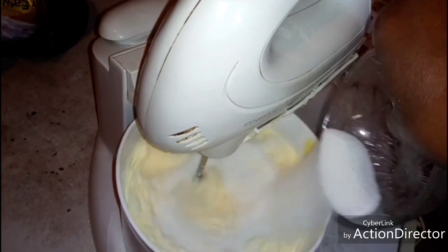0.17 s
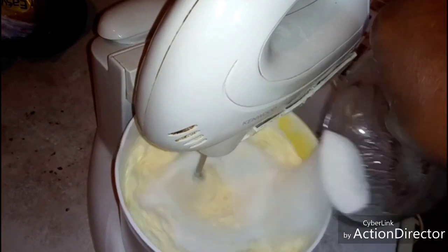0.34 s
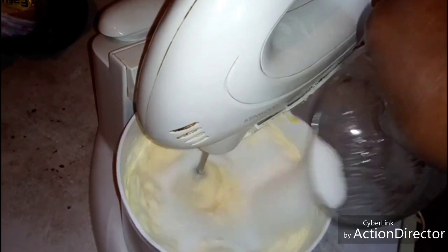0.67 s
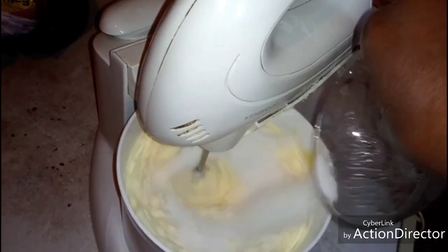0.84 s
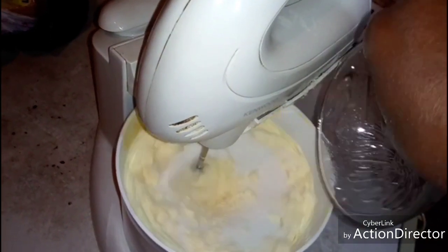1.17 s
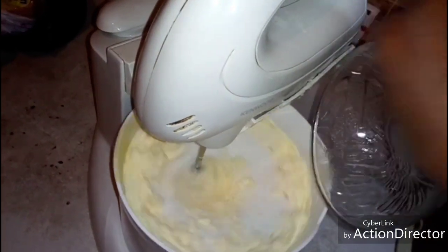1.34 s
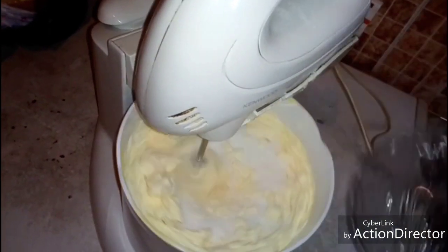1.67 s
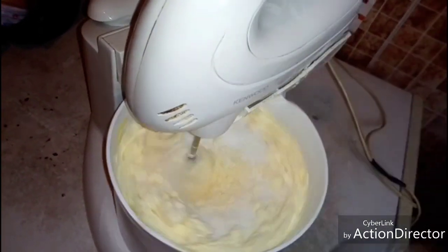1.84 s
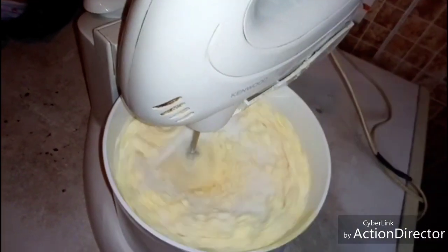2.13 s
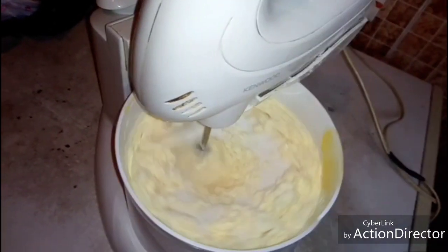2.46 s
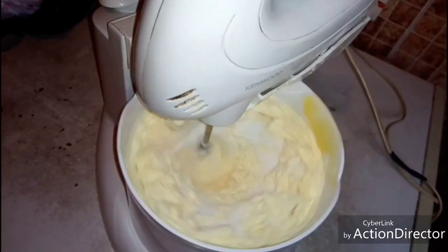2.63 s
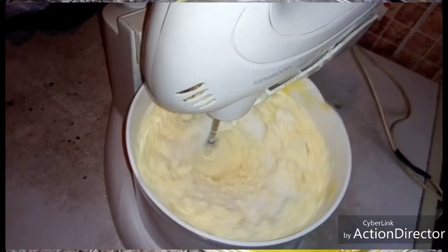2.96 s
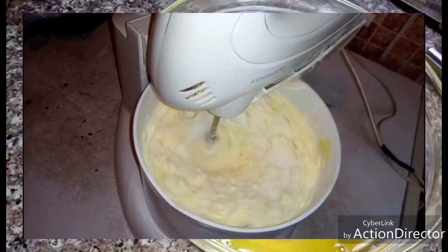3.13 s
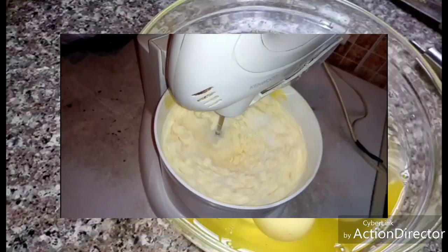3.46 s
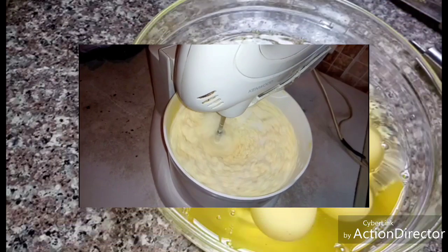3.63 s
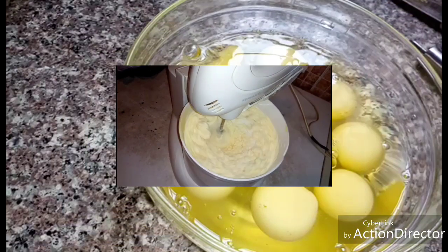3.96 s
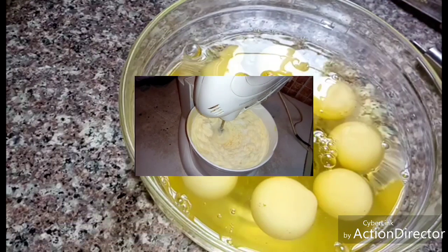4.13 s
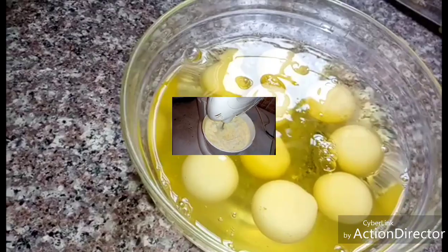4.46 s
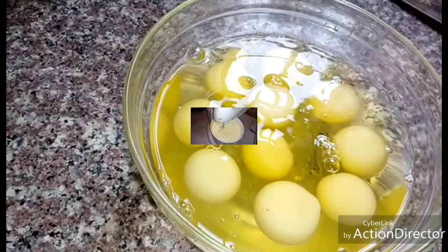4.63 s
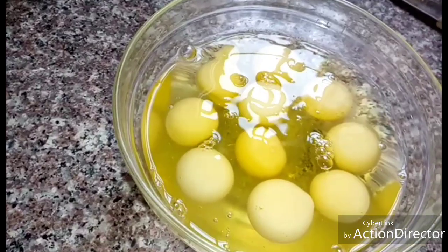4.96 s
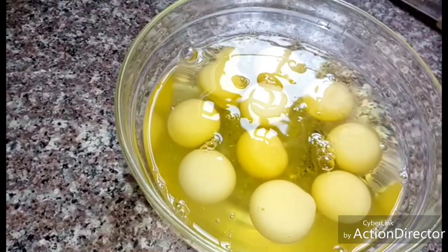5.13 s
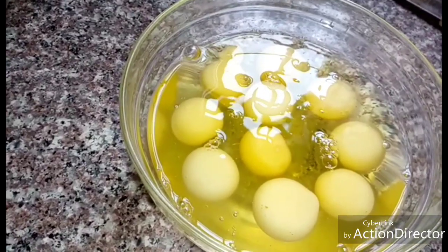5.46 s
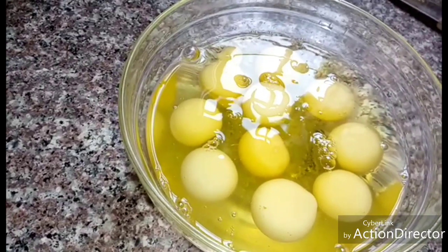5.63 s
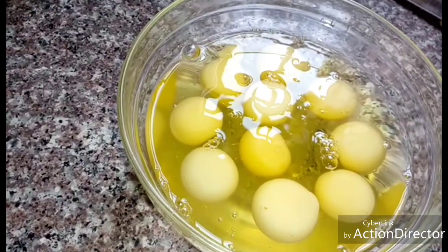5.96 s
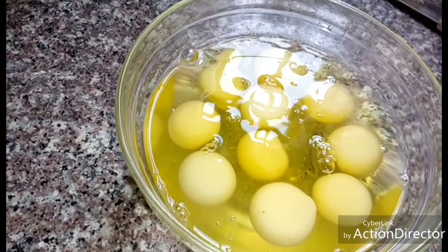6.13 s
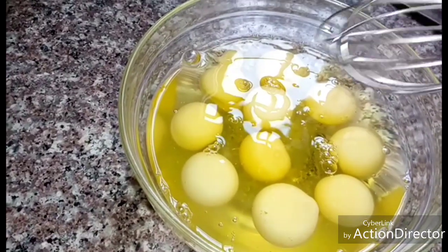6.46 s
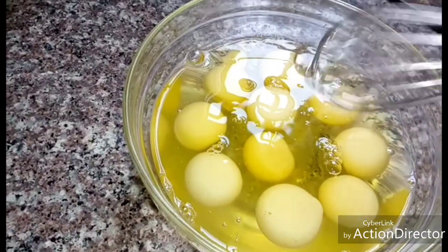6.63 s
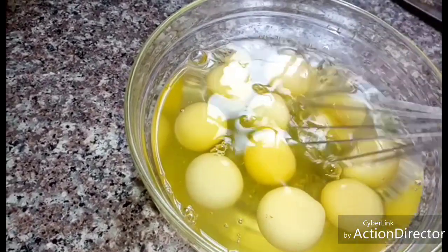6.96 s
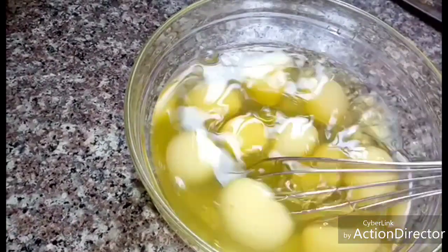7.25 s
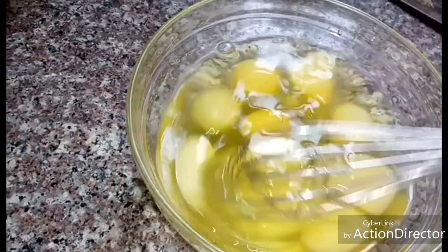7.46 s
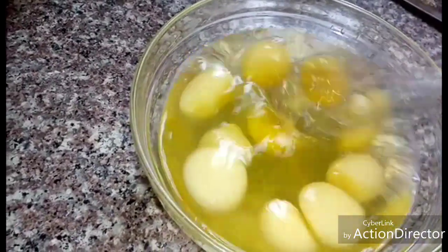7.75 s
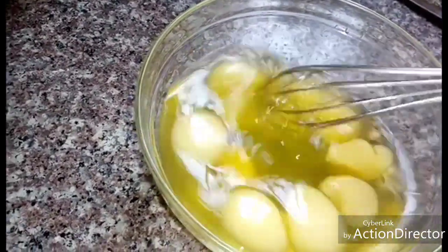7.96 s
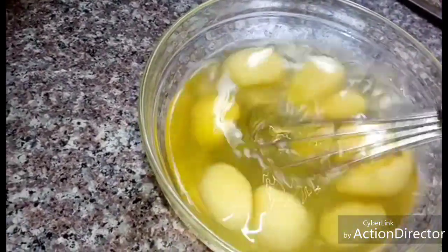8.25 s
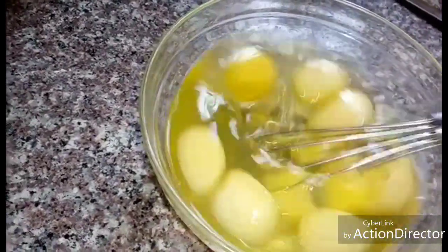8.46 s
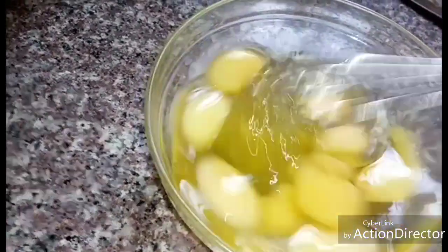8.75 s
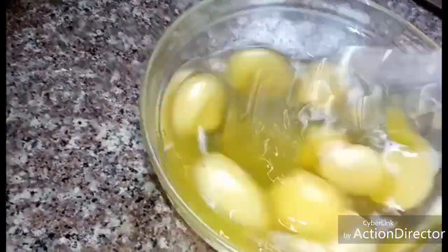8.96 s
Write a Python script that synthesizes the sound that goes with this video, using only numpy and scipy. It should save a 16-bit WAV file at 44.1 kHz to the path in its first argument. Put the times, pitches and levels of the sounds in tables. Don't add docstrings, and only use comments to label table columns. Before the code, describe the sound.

A hand mixer roars close up with a steady high whine, its beaters rasping sugar, crunching and knocking the bowl, rubbing the wall near the end. It cuts off suddenly. A very quiet kitchen fades in, faint sparrows chirping and a far dove cooing outside. Then a wire whisk strikes and scrapes a glass bowl of eggs in uneven clicks with short rings, while a nearer dove coos softly. One small microphone, dull bass.

```python
import sys
import numpy as np
from scipy import signal
from scipy.fft import rfft, irfft, next_fast_len
from scipy.io import wavfile

SR = 44100
rng = np.random.default_rng(int(sys.argv[2]) if len(sys.argv) > 2 else 0)


def makeup_ratio(level_db):
    decades = np.asarray(level_db, float) / 20
    return 10 ** decades


def master(y):
    cut = np.clip(np.atleast_2d(y).T, -1, 1)
    pcm = np.round(cut * 32767)
    wavfile.write(sys.argv[1], SR, pcm.astype(np.int16))


N = 400869
T = np.arange(N) / SR
CUT_S = 4.026

# (time [s], peak level [dB], crack pitch [Hz], top end level [dB], landing of the wires [ms])
BLOW_TABLE = [
    (7.122, -46, 3130, -30, 1.4),
    (7.238, -22.5, 3740, -52, 1.16),
    (7.695, -42.5, 3180, -44, .4),
    (8.117, -22.5, 5820, -7, 2.5),
    (8.233, -40.5, 3400, -30, .3),
    (8.7268, -27, 5500, -9, .7),
    (8.8636, -31.5, 7200, -1.5, .5),
    (8.8745, -33.5, 6600, -3, 0.91),
    (9.0614, -25, 4600, -34, 0.13),
    (9.086, -30.5, 1900, -5, 1.2),
]


def rms_one(x):
    return x / np.sqrt(np.mean(x ** 2) + 1e-20)


def in_time(rows):
    s, *columns = np.transpose(rows)
    return [np.interp(T, s, c) for c in columns]


def drift(rate):
    r = np.exp(-80 * np.pi * rate / SR)
    slow = signal.lfilter([1], [1, -2 * r, r * r], rng.standard_normal(N // 40 + 2002))[2000:]
    return np.interp(np.arange(N) / 40, np.arange(len(slow)), rms_one(slow))


def ring(x, hz, t60):
    r = makeup_ratio(-60 / (t60 * SR))
    w = 2 * np.pi * hz / SR
    return signal.lfilter([0, np.sin(w)], [1, -2 * r * np.cos(w), r * r], x + 1e-18)


def resonate(x, hz, width_hz):
    r = np.exp(-np.pi * width_hz / SR)
    poles = [1, -2 * r * np.cos(2 * np.pi * hz / SR), r * r]
    return signal.lfilter([(1 - r * r) / 2, 0, (r * r - 1) / 2], poles, x)


def band(x, hz, width_hz):
    return rms_one(resonate(resonate(x, hz, width_hz), hz, width_hz))


def coloured(spectrum, peaks, patchy_db):
    hz = np.maximum(np.fft.rfftfreq(N, 1 / SR), 1)
    point_hz, point_db = np.transpose(spectrum)
    db = np.interp(np.log(hz), np.log(point_hz), point_db)
    db = np.maximum(db, np.where(hz > 9000, point_db[-2], -200))
    for at, width, peak_db in peaks:
        db = db + peak_db / (1 + (2 * (hz - at) / width) ** 2)
    size = next_fast_len(N)
    shaped = rfft(rng.standard_normal(N), size)[:len(hz)] * makeup_ratio(db)
    octave = np.clip(np.log2(hz / 60), 0, 8)
    total = np.zeros(N)
    for k in range(9):
        part = irfft(shaped * np.maximum(1 - abs(octave - k), 0), size)[:N]
        total += part * makeup_ratio(patchy_db * drift(27))
    return rms_one(total)


def hump(start, length):
    u = np.clip((T - start) / length, 0, 1)
    return np.sin(np.pi * u ** 0.64)


def wavering(hz, blur_hz, clear):
    turn = 2 * np.pi * np.cumsum(hz) / SR
    blurred = drift(blur_hz) * np.cos(turn) + drift(blur_hz) * np.sin(turn)
    return np.sqrt(2 * clear) * np.cos(turn) + np.sqrt(1 - clear) * blurred


def microphone(x):
    x = signal.sosfilt(signal.butter(2, 120, "high", fs=SR, output="sos"), x)
    main = signal.sosfilt(signal.butter(6, 6900, fs=SR, output="sos"), x)
    return main + makeup_ratio(-32.5) * x + makeup_ratio(-14) * resonate(x, 15300, 900)


def mixer():
    # (time [s], brush whine [Hz], whine level [dB], fan tone level [dB])
    speed = [(0, 3372, -32, -32), (.22, 3362, -30, -30), (.6, 3338, -28.5, -31.5), (.92, 3327, -32, -34.5),
             (1.3, 3320, -29, -35.5), (1.62, 3319, -29.5, -39.5), (1.8, 3333, -30, -35),
             (2.2, 3329, -30.5, -35.5), (2.5, 3320, -29.5, -35.5), (2.9, 3315, -31, -39),
             (3.34, 3313, -30.5, -40.5), (3.55, 3300, -37.5, -37), (4.0, 3306, -38.5, -33)]
    whine_hz, whine_db, fan_db = in_time(speed)
    rotor_hz = whine_hz / 12
    turn = 2 * np.pi * np.cumsum(rotor_hz * (1 + .0005 * drift(25) + .0003 * drift(3))) / SR
    # 21.52 rotor turns each, one pass falling at 3.587 s
    beat = (turn - turn[round(3.587 * SR)]) / 21.52
    rubbed_s = np.clip(T - 3.22, 0, 1)
    motor = motor_roar(rubbed_s) + rotor_tones(turn, whine_db, fan_db) + motor_hum(turn)
    return motor + beater_rasp(beat, rubbed_s) + sugar_crunch(beat) + bowl_knocks()


def motor_roar(rubbed_s):
    # (frequency [Hz], level per Hz [dB])
    roar_shape = [(18, -68.5), (30, -38), (97, -14), (238, -8.5), (277, -8.5), (323, -7.5), (567, -4.5),
                  (1160, -12.5), (1620, -12.5), (2440, -11), (4380, -9.5), (6600, -19), (8310, -40),
                  (13500, -44)]
    # (frequency [Hz], width [Hz], level [dB])
    housing = [(180, 45, 5), (372.8, 54, 7), (475, 57, 3), (777, 30, 7), (1200, 250, -1.5),
               (1724, 340, 4.5), (2400, 330, -2), (3660, 340, -3.5), (4560, 1400, 2.5)]
    port = (15150, 1500, 15)
    roar_dip_db = -1.5 * np.clip(rubbed_s / .2 - 1, 0, 1)
    return makeup_ratio(-20.27 + roar_dip_db) * coloured(roar_shape, housing + [port], patchy_db=1.58)


def rotor_tones(turn, whine_db, fan_db):
    # (multiple [1], level at the start [dB], level at mid time [dB], level at the end [dB])
    rotor = [(1, -34.5, -33.5, -34), (2, -33.5, -37.5, -36.5), (5, -49, -44.5, -40.5),
             (6, -45.5, -41, -44.5), (7, -47, -43, -43), (13, -49, -52.5, -54), (16, -43, -43, -43.5),
             (14, -44, -52, -52), (23, -56, -56, -62), (25, -65, -60, -61), (28, -70, -68, -68),
             (30, -76, -74, -70), (35, -84, -82, -74), (36, -74, -72, -80), (38, -73, -77, -70),
             (40, -77, -73, -72), (42, -76, -82, -78), (43, -79, -71, -70), (45, -77, -82, -73),
             (48, -82, -82, -72), (52, -74, -69, -73), (53, -72, -72, -65), (54, -66, -67, -72),
             (55, -76, -69, -68)]
    # (multiple [1], level [dB], time [s], length [s])
    overtones = [(11, -46, 0, .5), (11, -48, 2.8, 1.2), (24, -45, .3, 1.0), (24, -48, 1.2, 1.6),
                 (24, -45, 2.7, .9), (24, -48, 3.5, .6), (18.6, -44, 3.1, 1.0), (.7, -40, 0, 4.5),
                 (6.66, -43, 1.4, 2.6)]
    tones = np.zeros(N)
    for k, *levels in rotor:
        db = np.interp(T, [0, CUT_S / 2, CUT_S], levels) + 6 + 3.0 * (k > 22)
        tones += makeup_ratio(db + 1.3 * drift(14)) * np.sin(k * turn + k * k)
    for k, db, s, length in overtones:
        tones += makeup_ratio(db + 4 + 2 * drift(5)) * hump(s - .1, length) * np.sin(k * turn)
    tones += makeup_ratio(whine_db + 2.7 + 1.2 * drift(18)) * np.sin(12 * turn)
    tones += makeup_ratio(fan_db + 2.0 + 2.5 * drift(9)) * np.sin(10 * turn)
    tones += makeup_ratio(-45 + 3 * T + 2 * drift(4)) * np.sin(20 * turn)
    return tones


def motor_hum(turn):
    mains = 2 * np.pi * 100.4 * T
    hum = makeup_ratio(-40 + 1.2 * drift(5.6)) * np.sin(mains)
    hum += makeup_ratio(-40 - 2.26 * T) * np.sin(.3722 * turn + 1.1)
    hum += makeup_ratio(-44.5 + 6.3 * drift(12.0)) * 2 * np.sin(mains) * np.sin(turn)
    return hum


def beater_rasp(beat, rubbed_s):
    grains = (rng.random(N) < 2500 / SR) * makeup_ratio(2.9 * np.minimum(rng.exponential(1, N), 3))
    grains = grains * rng.choice([-1, 1], N)
    rasp = microphone(band(grains, 4500, 1100) + makeup_ratio(-3.5) * band(grains, 1650, 620))
    rub_db = 11 * np.minimum(rubbed_s / .2, 1) - 3.5 * rubbed_s ** 2
    swing_db = 3 * np.cos(beat - .4) * np.cos(2 * beat - .8)
    return rasp * makeup_ratio(-36 + rub_db + swing_db)


def sugar_crunch(beat):
    # (time [s], peak level [dB])
    crushes = [(0.0969, -38), (.263, -38), (0.9455, -35.5), (1.175, -39), (1.318, -38), (1.645, -43),
               (2.069, -41), (2.623, -34.5), (3.05, -35.5), (1.4867, -32.5), (1.7968, -32), (1.954, -34),
               (2.1852, -37), (2.34, -41), (2.6483, -32.5), (2.7314, -33), (2.8069, -29.5), (3.1955, -33),
               (3.506, -34), (3.5855, -36), (3.663, -36), (3.744, -35), (3.9, -33)]
    passes = np.diff(beat // np.pi, prepend=0) == 1
    clicks = passes * makeup_ratio(-44.5 + 2.5 * np.cos(beat) + 3.0 * drift(30))
    clicks[[round(s * SR) for s, db in crushes]] = makeup_ratio(np.array(crushes)[:, 1])
    grit = rng.standard_normal(400) * makeup_ratio(-60 * np.arange(400) / (.015 * SR))
    burst = np.convolve(clicks, grit)[:N]
    crunch = makeup_ratio(-2) * resonate(burst, 9500, 6000) + makeup_ratio(4) * resonate(burst, 15100, 1500)
    crunch += makeup_ratio(16) * microphone(resonate(burst, 4500, 2500))
    return crunch + makeup_ratio(18) * ring(clicks, 4500, .008)


def bowl_knocks():
    # (time [s], level [dB], pitch [Hz], time to fall 60 dB [s])
    knock_table = [(0.329, -9, 4550, 0.026), (.946, -12, 4600, 0.032), (2.186, -15, 3740, 0.06),
                   (2.584, -14, 2200, .03), (2.585, -14, 1550, .04), (2.623, -15, 5200, .012),
                   (2.651, -13, 3740, .05), (2.653, -14, 4700, .04), (2.654, -21, 3050, .04),
                   (2.731, -16, 3850, .03), (2.732, -17, 4600, .02), (2.808, -13, 4450, .025),
                   (2.808, -18, 3790, .05), (3.196, -17, 4500, .02), (3.432, -8, 4700, .015),
                   (3.5868, -5.5, 4430, .016), (3.744, -16, 4740, .02), (3.9, -7, 4510, 0.014),
                   (2.8, -25.5, 2760, 1.3), (3.2, -20, 3265, 1.0)]
    shake = rng.standard_normal(N)
    knocks = np.zeros(N)
    for s, db, hz, t60 in knock_table:
        at, t = round(s * SR), T[:round(t60 * SR)]
        body = .55 * band(shake[at:][:len(t)], hz, 0.23 * hz)
        if t60 < .5:
            body = body + 1.1 * np.sin(2 * np.pi * hz * t)
        knocks[at:][:len(t)] += makeup_ratio(db - 60 * t / t60) * np.minimum(t / .0012, 1) * body
    return signal.sosfilt(signal.butter(4, 6000, fs=SR, output="sos"), knocks)


def blows():
    # (pitch [Hz], level [dB], time to fall 60 dB [s])
    rings = [
        [(3180, -3.5, 0.17), (3300, -11, .2), (4560, -4, .2), (4620, -11, .3), (5800, -14, .2), (6150, -10, .2)],
        [(1740, -1, 0.055), (965, -9, 0.04), (1296, -4.5, 0.047), (3000, -1, .03), (2535, -5, .25),
         (2610, 3.5, 0.037), (3785, 4.5, .15), (3740, -15, 0.33), (5230, -8, 0.32), (5300, -14, 0.27),
         (6700, -12, 0.14), (8576, -25, 0.33), (9450, -19, .3), (10400, -10, .15), (7300, -26, .3)],
        [(3200, 8.5, 0.03), (4300, -15, .05), (5000, -11, .05)],
        [(480, -21.5, 0.15), (1185, -7, .06), (2160, -15, 0.056), (3250, -17, 0.15), (3400, -14.5, 0.13),
         (4100, -13, 0.036), (5000, -9, 0.036), (5700, -12, .05), (7260, -18, .1), (9450, -14, .04),
         (10850, -4, .04), (13540, -7, .04)],
        [(3070, 11, 0.017), (9400, 8, .008), (7800, -6, .008)],
        [(3500, -10.5, 0.054), (5300, -14, 0.048), (6960, -10, 0.047), (9500, -10, 0.14), (11400, -4, .1),
         (12200, -4, .08), (8600, -6, .04), (2250, -20, .1), (1250, -22, .05)],
        [(6700, -16, .03)],
        [(4480, -14, 0.08), (4710, -16, .12), (6470, -20, .15)],
        [(2053, 6.5, .03), (1500, -26, .03), (3300, -4, 0.011)],
        [(1600, -1, .05)],
    ]
    out, t = np.zeros(N + SR), T[:SR // 2]
    tail_fall = makeup_ratio(-60 * t / 0.167)
    for (s, db, hz, top_db, landing_ms), modes in zip(BLOW_TABLE, rings):
        rise = np.minimum(1000 * t / max(landing_ms, .05), 1)
        wires = np.clip(landing_ms / 1.4, .3, 1)
        noise = rng.standard_normal((3, len(t)))
        ping = makeup_ratio(-8) * resonate(ring(1.0 * (t == 0), hz, .012), hz, hz)
        crack = makeup_ratio(-6.0) * microphone(band(noise[0], hz, 3500)) * makeup_ratio(-60 * t / (0.023 * wires))
        top = band(noise[1], 15200, 1300) + makeup_ratio(-14) * band(noise[1], 9300, 6000)
        tick = makeup_ratio(top_db + 3.5) * top * (makeup_ratio(-60 * t / .009) + makeup_ratio(-32.5) * tail_fall)
        tail = makeup_ratio(-21.5) * wires * microphone(band(noise[1], 0.82 * hz, 5500)) * tail_fall
        rattle = (t == 0) + makeup_ratio(-28.0) * wires * noise[2] * tail_fall
        rung = np.zeros(len(t))
        for mode_hz, mode_db, t60 in modes:
            rung += makeup_ratio(mode_db - 9.5) * resonate(ring(rattle, mode_hz, t60), mode_hz, mode_hz)
        thin = signal.butter(2, .3 * hz, "high", fs=SR, output="sos")
        hit = signal.sosfilt(thin, rise * (ping + crack + tick + tail)) + rise * microphone(rung)
        out[round(s * SR):][:len(t)] += makeup_ratio(db) * hit
    return out[:N]


def scrape():
    glass_hz = [1275, 1610, 2230, 2450, 2720, 2960, 3400, 3850, 4120, 4710, 4980, 5420, 5630, 6470]
    # (time [s], length [s], level
    # [dB], pitch [Hz], width [Hz])
    swishes = [(7.106, .1, -71, 5800, 1200), (7.233, 0.17, -48, 2170, 3980), (7.264, 0.15, -55.5, 700, 900),
               (7.305, 0.076, -60, 4400, 5000), (7.31, .05, -56, 5130, 400), (7.25, .1, -53, 1400, 900),
               (7.31, .05, -52, 1650, 500), (7.36, 0.35, -68, 5700, 700), (7.4, 0.17, -67, 4100, 300),
               (7.43, .18, -62, 2960, 900), (7.621, 0.21, -74, 5500, 400), (8.14, 0.12, -66, 3500, 2500),
               (8.128, .04, -57, 5000, 1500), (7.7, .05, -68, 3100, 400), (7.85, .25, -77, 3500, 2500),
               (8.15, .2, -74, 2000, 300), (8.38, .15, -77, 2920, 300), (8.235, 0.055, -66, 3700, 1800),
               (8.299, 0.33, -73.5, 3200, 500), (8.332, .1, -74, 3850, 250), (8.48, .05, -77, 5000, 3000),
               (8.605, 0.17, -63, 4100, 400), (8.622, 0.15, -61, 2750, 1200), (8.65, 0.06, -69, 5400, 1200),
               (8.731, 0.12, -68, 2240, 500), (8.82, 0.06, -65, 3850, 200), (8.878, 0.095, -56, 2700, 1100),
               (8.88, 0.1, -66, 1500, 600), (8.874, 0.096, -62, 5470, 3000), (8.72, .1, -67, 5500, 3000),
               (8.975, .07, -69, 3800, 1200), (9.01, .04, -57.5, 2120, 400),
               (9.029, 0.032, -56.5, 2600, 900), (8.95, .11, -65, 2750, 500), (9.048, .04, -63, 4000, 4000),
               (9.064, .05, -59, 4000, 4000),
               (8.115, .045, -40, 11800, 2600), (8.125, .12, -63, 3400, 200), (8.88, .1, -63, 4500, 500),
              (8.695, .02, -60, 3000, 700), (8.65, .03, -64, 5300, 1500), (8.84, .02, -65, 3400, 300),
              (8.86, .04, -65, 3450, 300), (8.73, .12, -70, 4900, 200), (8.68, .2, -72, 1270, 100)]
    wires = makeup_ratio(-8) * rng.standard_normal(N)
    for mode_hz in [*np.geomspace(300, 7500, 30) * rng.uniform(0.92, 1.03, 30), *glass_hz]:
        clicks = (rng.random(N) < 400 / SR) * makeup_ratio(2.5 * np.minimum(rng.exponential(1, N), 4))
        wires += rms_one(ring(clicks, mode_hz, 0.058)) * np.sqrt(mode_hz / 44 / 3000)
    strokes = np.zeros(N)
    for s, length, db, hz, width_hz in swishes:
        strokes += makeup_ratio(db) * hump(s, length) * band(wires, hz, width_hz)
    return microphone(strokes)


def singing_bowl():
    # (pitch [Hz], level [dB], time to fall 60 dB [s])
    glass_tones = [
        (1336, -48.5, 0.88),
        (2390, -47.5, 0.86),
        (3700, -45, 0.46),
        (5130, -39, 0.24),
    ]
    since = np.maximum(T - 7.315, 0)
    sing = np.zeros(N)
    for hz, db, t60 in glass_tones:
        sing += makeup_ratio(db - 60 * since / t60) * wavering(np.full(N, hz), 30, clear=0.88)
    sing *= np.minimum(since / 0.043, 1)
    return sing * makeup_ratio(-60 * np.maximum(T - 7.46, 0) / .12)


def sparrows():
    # (time [s], peak level [dB], pitch [Hz], length [s], wing rustle level [dB])
    near = [
        (4.202, -66, 4000, 0.095, -30),
        (4.425, -59, 4280, 0.093, -30),
        (4.793, -56, 4330, 0.11, -24),
        (5.204, -54, 4200, 0.077, -11),
        (5.511, -53, 4220, 0.095, -13),
        (5.828, -55, 4190, 0.11, -32),
        (6.193, -62, 4120, 0.085, -28),
    ]
    # (time [s], peak level [dB], pitch [Hz])
    far = [(4.413, -67, 5880), (4.478, -64, 5940), (4.651, -65, 5390), (4.889, -74, 6080),
           (5.039, -67, 5380), (5.083, -64, 5500), (5.142, -67, 5480), (5.1, -67, 5000), (5.18, -66, 5800),
           (5.19, -69, 6600), (5.25, -68, 5850), (5.51, -66, 5500), (5.545, -65, 4720), (5.55, -69, 6100),
           (5.555, -73, 6870), (5.57, -69, 5020), (6.357, -68, 5770), (6.42, -69, 6550), (6.44, -69, 5600),
           (6.45, -72, 7400), (6.55, -63, 6080), (6.575, -65, 5750), (6.58, -65, 6850), (6.61, -66, 5320),
           (6.62, -71, 7450), (6.649, -64, 5270), (6.715, -61, 4700), (6.755, -62, 5670),
           (6.818, -60, 6480), (6.85, -62, 6520), (6.82, -71, 7200), (6.855, -63, 5400), (6.88, -66, 5250),
           (6.99, -66, 5450), (7.0, -60, 5080), (7.04, -63, 5580)]
    out = np.zeros(N)
    for s, db, hz, length, wing_db in near + [(*row, 0.072, -36) for row in far]:
        out[round((s - .02) * SR):][:SR // 3] += makeup_ratio(db - 7.5) * chirp(hz, length + 0.014, wing_db)
    return out


def chirp(hz, length, wing_db):
    t = T[:SR // 3]
    sag = np.clip(t / length, 0, 1)
    shape = np.sin(np.pi * sag ** .7)
    noise = rng.standard_normal((5, len(t)))
    clear = np.sin(2 * np.pi * np.cumsum(hz * (1.005 - .025 * sag ** 3)) / SR)
    note = .8 * clear + .8 * band(noise[0], hz, 140) + .5 * sag * band(noise[1], hz * .94, 200)
    cloud = makeup_ratio(-8) * microphone(band(noise[2], hz * 1.03, 1100))
    wings = makeup_ratio(wing_db) * band(noise[3], 15000, 1200)
    echo = makeup_ratio(-4 - 60 * t / .6) * sag * band(noise[4], hz, 180)
    return shape * (note + cloud + wings) + echo


def doves():
    # (time [s], length [s], level [dB], pitch [Hz])
    far_coos = [
        (4.17, 0.17, -72, 600),
        (4.3, 0.22, -73, 708),
        (4.57, 0.18, -70.5, 660),
        (4.72, 0.27, -72, 688),
        (5.05, 0.15, -72.5, 690),
        (5.23, .15, -75, 650),
        (5.38, 0.28, -72, 645),
        (5.56, 0.34, -68.5, 682),
        (5.96, .08, -78, 687),
    ]
    # (time [s], length [s], level [dB], pitch [Hz])
    near_coos = [(7.125, 0.11, -65, 696), (7.405, 0.084, -59, 666), (7.49, 0.11, -61, 700),
                 (7.77, .07, -71, 680), (7.84, 0.054, -63.5, 680), (7.92, 0.075, -64, 675),
                 (7.98, 0.24, -58, 695), (8.17, 0.15, -55.5, 685), (8.26, 0.22, -65.5, 675),
                 (8.43, 0.31, -56.5, 657), (8.85, 0.14, -70.5, 630)]
    return makeup_ratio(1.5) * coos(far_coos, 90, clear=.2) + coos(near_coos, 30, clear=.92)


def coos(rows, blur_hz, clear):
    out, throb, air = np.zeros(N), makeup_ratio(1.0 * drift(14)), rng.standard_normal(N)
    for s, length, db, hz in rows:
        swell = np.sin(np.pi * np.clip((T - s) / length, 0, 1)) ** 0.97
        pitch_hz = hz - 46 * np.clip(T - s, 0, length)
        voice = wavering(pitch_hz, blur_hz, clear) + makeup_ratio(-19) * wavering(2 * pitch_hz, 60, clear=0.24)
        out += makeup_ratio(db) * swell * (throb * voice + makeup_ratio(-17) * band(air, 0.96 * hz, 260))
    return out


def faint_whistles():
    # (time [s], level [dB], pitch [Hz], length [s])
    whistles = [(4.461, -66.5, 1360, 0.12), (4.922, -73, 2970, 0.19), (5.39, -73, 3350, .06),
                (5.692, -77, 3370, 0.084), (5.931, -72, 1426, 0.12), (6.04, -72, 3230, 0.079),
                (6.38, -79, 2970, 0.12), (6.54, -77, 2980, .13), (4.7, -67, 115, 0.18),
                (6.72, -60, 119.6, 0.25), (7.127, -72, 1170, .05), (7.47, -64, 1600, 0.072),
                (7.798, -72, 1660, 0.073), (8.34, -69, 1155, .09), (8.4, -68, 1265, .13),
                (7.52, -77, 1330, 0.22), (7.81, -67, 815, .12), (7.47, -69, 784, 0.15),
                (8.87, -70, 568, .1), (8.725, -65, 782, .055), (8.73, -66.5, 530, .06),
                (7.2, -69, 1160, .07), (7.93, -71, 745, 0.14), (7.238, -63, 318, .12),
                (7.252, -69, 200, .09), (7.26, -63, 532, .13)]
    out = np.zeros(N)
    wander = 1 + .008 * drift(4)
    for s, db, hz, length in whistles:
        out += makeup_ratio(db + 1.5) * hump(s - .015, 1.35 * length) ** 2 * wavering(hz * wander, 25, clear=.5)
    return out


def kitchen():
    # (frequency [Hz], level per Hz [dB])
    room_shape = [(18, -41), (35, -17), (60, -3), (122, -1.5), (397, -11), (628, -11), (791, -14),
                  (1700, -19), (3230, -17.5), (4170, -17), (7890, -35), (13500, -41)]
    port = (15150, 1500, 6)
    return makeup_ratio(-69.7) * coloured(room_shape, [port], patchy_db=1.4)


def scene():
    cut = makeup_ratio(-60 * np.clip((T - CUT_S) / 0.00196, 0, 2))
    cut = cut + makeup_ratio(-39 - 60 * np.maximum(T - CUT_S, 0) / 0.037)
    fade = np.clip((T - CUT_S) / 0.31, 0, 1)
    whisk = blows() + scrape() + singing_bowl()
    background = sparrows() + doves() + faint_whistles()
    mono = cut * mixer() + fade * (whisk + background + kitchen())
    return np.array([mono, mono])


def band_limit(x):
    return signal.sosfilt(signal.butter(12, 16870, fs=SR, output="sos"), x)


def record(dry):
    top_hz = 15540
    kept = signal.sosfilt(signal.ellip(12, .3, 44, top_hz, fs=SR, output="sos"), dry)
    top = signal.sosfiltfilt(signal.butter(10, top_hz, "high", fs=SR, output="sos"), dry)
    sharp = np.zeros(N)
    for k in (3, 5, 6, 7, 9):
        sharp += np.maximum(1 - abs(T - BLOW_TABLE[k][0] - .002) / .006, 0)
    return band_limit(kept + makeup_ratio(-3) * top * sharp)


dry = scene()
out = record(dry)
master(out)
```